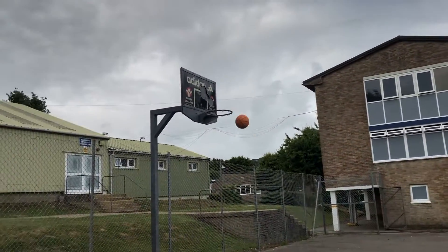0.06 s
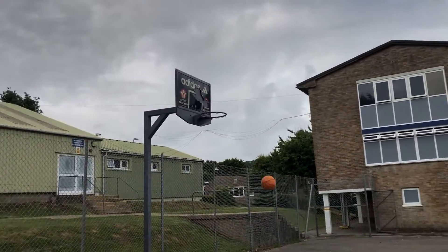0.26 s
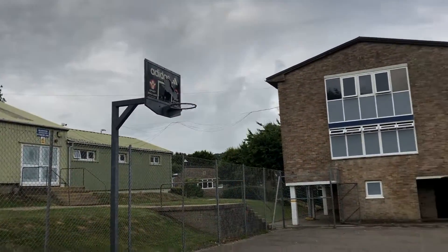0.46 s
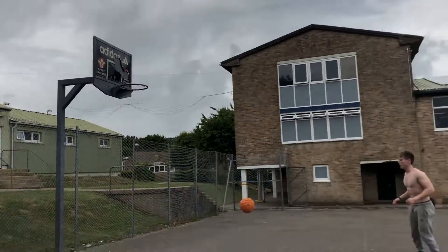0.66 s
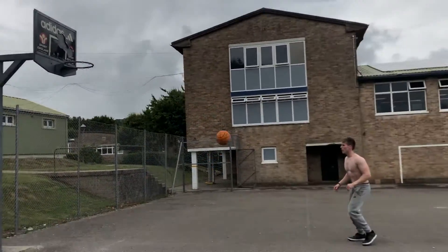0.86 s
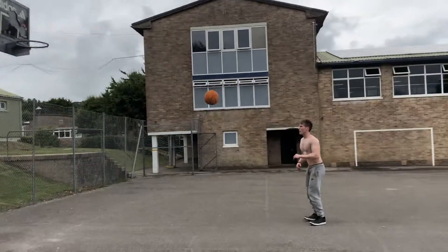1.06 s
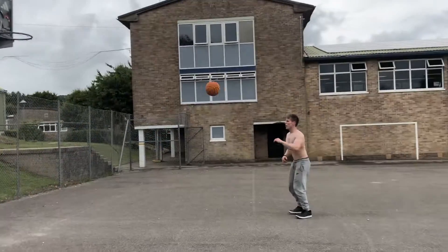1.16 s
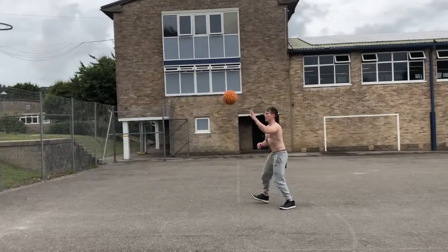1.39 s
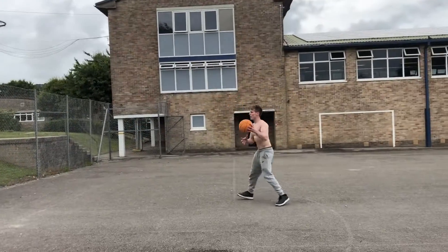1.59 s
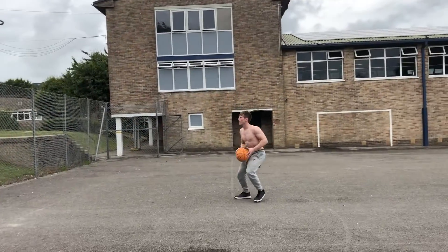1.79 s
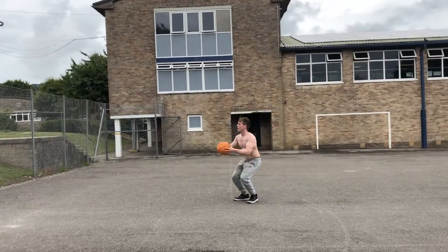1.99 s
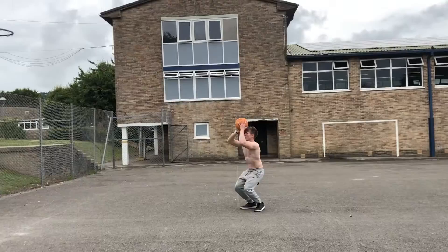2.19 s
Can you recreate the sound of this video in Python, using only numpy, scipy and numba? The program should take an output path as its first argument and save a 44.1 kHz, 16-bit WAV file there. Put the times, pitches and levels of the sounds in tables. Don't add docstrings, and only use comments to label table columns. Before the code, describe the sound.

A basketball bounces once on asphalt with a sharp, hollow bang and quick brick-wall echo. Before it a loose metal hoop rattles; afterwards wind buffets the phone microphone over faint shoe scuffs and hand taps outdoors.

```python
import sys
import numpy as np
from scipy import signal
from scipy.fft import rfft, irfft
from scipy.io import wavfile
from scipy.ndimage import uniform_filter1d
from numba import njit

SR = 44100
rng = np.random.default_rng(int(sys.argv[2]) if len(sys.argv) > 2 else 0)


def boost(x):
    u = np.asarray(x, float) / 20
    return 10 ** u


def digitize_waveform(pressure):
    field = np.atleast_2d(pressure).T
    bounded = np.clip(field, -1, 1)
    quanta = np.round(bounded * 32767).astype(np.int16)
    wavfile.write(sys.argv[1], SR, quanta)


N = 99048
T = np.arange(N) / SR
BOUNCE_S = 0.5012

# frequency in Hz, density in dB per Hz.
STREET_SPECTRUM = [(24, -33), (40, -18), (365, 2.5), (523, -18), (813, -15.5), (1330, -18.5), (2000, -28.5),
                   (2600, -64.5), (4400, -120)]
# frequency in Hz, density in dB per Hz.
AIR_SPECTRUM = [(300, -1), (600, -8.5), (1200, -15.5), (2300, -25), (4200, -28.5), (5800, -22),
                (7500, -33.5), (15500, -38)]
# time in seconds, level in dB.
GUST_LEVELS = [
    (0, -73),
    (.08, -58),
    (.8, -51),
    (.84, -52.5),
    (1.2, -43.5),
    (1.5, -44.5),
    (1.75, -47),
    (1.83, -46.5),
    (2.18, -48.5),
    (2.25, -51),
]
# peak in seconds, level in dB, corner in Hz, half length in seconds.
WIND_BUFFETS = [(.025, -48.5, 71, 0.032), (0.85, -36.5, 108.7, 0.014), (0.879, -36, 84, 0.0077),
                (0.919, -35.5, 168, 0.0082), (0.941, -30.5, 99.5, 0.016), (1.004, -40, 162, 0.03),
                (1.072, -35, 175, 0.016), (1.101, -36.5, 129, 0.0061), (1.131, -33.5, 246, 0.017),
                (1.176, -35, 173, .012), (1.258, -34.5, 113, 0.0075), (1.291, -40, 79.6, 0.034),
                (1.366, -33, 166, 0.016), (1.397, -28.5, 129, 0.0068), (1.426, -32.5, 110, 0.009),
                (1.482, -34, 163, 0.023), (1.548, -39.5, 129, 0.02), (1.62, -39, 120, 0.0071),
                (1.695, -41.5, 89, 0.019), (1.97, -50, 103, 0.021), (2.042, -44.5, 127, 0.0066),
                (2.118, -34.5, 103, 0.0053), (2.209, -38.5, 214, 0.011), (2.238, -36.5, 99, 0.034)]
SCUFF_STARTS = [1.7, 1.697, 1.7, 1.492, 2.093, 1.83, .484, 1.4, 1.835, 1.5, 1.705, 1.701, 1.701, 1.865,
                1.917, 1.585]
# length in seconds, level in dB, centre in Hz, width in Hz.
SCUFF_SOUNDS = [(0.061, -50, 1350, 640), (0.032, -64.5, 5200, 1550), (0.041, -60.5, 2200, 2900),
                (0.033, -66.5, 6100, 3000), (0.019, -65.5, 1500, 2100), (0.073, -61.5, 640, 700),
                (0.021, -52, 2000, 5800), (0.232, -63, 470, 680), (0.014, -64, 6300, 1400),
                (0.034, -71, 860, 2000), (0.024, -72, 13000, 8000), (0.051, -65, 2040, 420),
                (.008, -50.5, 1070, 680), (0.0055, -70.5, 2600, 2400), (0.011, -71, 5600, 2200),
                (.035, -72, 1360, 1700)]
TICK_STARTS = [.027, .03, .191, .232, .593, .597, .645, .646, .664, 1.057, 1.404, 1.428, 1.453, 1.545, 1.59,
               1.629, 1.663, 1.6735, 1.702, 1.7025, 2.115, 2.155, 2.243]
# peak in dB, pitch in Hz, t60 in seconds.
TICK_RINGS = [(-42, 1086, 0.024), (-43.5, 361, 0.068), (-38, 312, 0.029), (-39, 1050, .0072),
              (-40.5, 1660, 0.034), (-42.5, 563, .04), (-43.5, 362, 0.027), (-47, 1030, .03),
              (-54.5, 3600, 0.014), (-51, 6530, .006), (-50, 1900, 0.0043), (-49, 1800, 0.0056),
              (-39, 970, 0.0046), (-62.5, 5800, .006), (-38, 930, 0.0033), (-54, 5900, 0.0027),
              (-38.5, 1300, 0.0061), (-46, 1520, 0.0099), (-40, 494, 0.024), (-47, 1160, 0.0071),
              (-44.5, 500, 0.018), (-40.5, 425, 0.017), (-41.5, 1430, 0.0055)]
# start in seconds, peak in dB, low edge in Hz, high edge in Hz.
DRY_SNAPS = [(.0025, -37.5, 4500, 15500), (.0055, -56, 4500, 15500), (.0925, -60, 3500, 10900),
             (0.205, -46, 4000, 15000), (.2205, -52, 4000, 15500), (0.2326, -47, 3000, 14800),
             (0.255, -45, 3500, 8950), (.319, -54, 5000, 11000), (.437, -46, 8000, 15000),
             (0.5642, -41, 2500, 8000), (.582, -48, 5000, 15000), (.604, -48, 4000, 10000),
             (.615, -49, 4500, 15500), (.643, -59, 2500, 7000), (.6915, -54, 4000, 10000),
             (.7385, -49, 4000, 14100), (1.02, -51, 4500, 9000), (1.058, -47.5, 3000, 8600),
             (1.428, -47.5, 1500, 8800), (1.452, -48, 1200, 4000), (1.594, -50, 1200, 7000),
             (1.609, -50.5, 1500, 7000), (1.662, -49.5, 2000, 7900), (1.6732, -50, 2200, 7900),
             (1.6965, -50, 2800, 9100), (1.7, -56, 4000, 12000), (1.838, -50.5, 2200, 8000),
             (1.85, -55, 2500, 5970), (2.2435, -61, 1000, 6000)]
# start in seconds, peak in dB, decay in seconds.
RIM_SWINGS = [(0.0024, -36, 0.01), (0.0552, -45.5, 0.014), (0.1165, -35, 0.0069), (0.189, -33, 0.013),
              (0.271, -40, 0.015), (0.2864, -33, 0.0093), (0.348, -34, 0.0096), (0.4213, -34, 0.01),
              (0.559, -38, 0.023), (0.641, -46.5, 0.033), (0.715, -49.5, 0.03), (0.7762, -34.5, 0.0063),
              (0.836, -40, 0.011), (0.9125, -37, 0.0069), (0.9897, -42.5, 0.013), (1.1267, -38.5, 0.0085),
              (1.1833, -41, 0.008)]
# frequency in Hz, density in dB per Hz.
RATTLE_SPECTRUM = [(88, -9.5), (150, 7.5), (388, -3.5), (1130, -6), (1760, -12.5), (3400, -16.5),
                   (5900, -11.5), (8000, -22), (15500, -51.5)]
# frequency in Hz, level in dB, t60 in seconds.
HOOP_MODES = [(341, -6.5, 0.057), (669, -11.5, 0.15), (1103, -7.5, 0.077), (1764, -9, 0.046),
              (2688, -10, 0.027), (5810, -22, .04)]
# frequency in Hz, level in dB, delay after contact in seconds, rise in seconds.
BALL_MODES = [(63.7, -20, 0.014, 0.0035), (103, -14.5, 0.0081, 0.002), (263.4, -24.5, 0.00018, 0.0041),
              (437, -26, 0.0025, 0.0021), (622, -25, 0.0015, 0.0015), (988, -21.5, 0.00051, 0.0016),
              (1057, -29, 0.00721, 0.0033), (1336, -16.5, 0.00067, 0.00045),
              (1655, -24.5, 0.00092, 0.00087), (2444, -31, .0007, 0.00032), (4070, -27.5, .0004, 0.00025),
              (4780, -25, 0.0003, 0.00061), (5930, -16, 0.00032, 0.00022), (8280, -27, 0.000087, 0.0001)]
# delay in seconds, level in dB, top in Hz.
WALL_ECHOES = [
    (0.0904, -15, 3500),
    (.146, -23.5, 1190),
]
# frequency in Hz, density in dB per Hz.
TAIL_SPECTRUM = [(88, -8.5), (150, -1), (515, -19.5), (636, -8.5), (742, -16), (1090, -10.5), (2230, -27),
                 (6060, -27), (15000, -62)]


def unit(x):
    return x / np.sqrt(np.mean(x ** 2))


def noise():
    return rng.standard_normal(N)


def colour(x, shape):
    hz, db = np.array(shape).T
    f = np.maximum(np.arange(N // 2 + 1) * SR / N, 1)
    gain = boost(np.interp(np.log(f), np.log(hz), db, left=-90))
    return unit(irfft(rfft(x) * gain, N))


def ring(x, hz, t60):
    pole = np.exp(2j * np.pi * hz / SR - np.log(1000) / (t60 * SR))
    return signal.lfilter([1], [1, -pole], x.astype(complex)).imag


def band(x, lo_hz, hi_hz):
    edges = [max(lo_hz, 20), min(hi_hz, 0.45 * SR)]
    return signal.sosfilt(signal.butter(2, edges, "bandpass", fs=SR, output="sos"), x)


def swell(start, rise, fall):
    t = np.maximum(T - start, 0)
    return (1 - np.exp(-t / rise)) * np.exp(-t / fall)


def grains(per_s, spread_db):
    hit = rng.random(N) < per_s / SR
    sign = np.sign(noise())
    size = rng.exponential(size=N)
    return unit(hit * sign * boost(spread_db * size))


def walk(rate):
    k = int(SR / rate)
    steps = np.repeat(rng.standard_normal(N // k + 1), k)[:N]
    return unit(uniform_filter1d(uniform_filter1d(steps, k), k))


@njit
def sweep(x, hz, damp):
    y, b, l = np.empty(len(x)), 0., 0.
    for i in range(len(x)):
        g = np.tan(np.pi * hz[i] / SR)
        v = (b + g * (x[i] - l)) / (1 + g * (g + damp))
        y[i] = l + g * v
        b, l = 2 * v - b, 2 * y[i] - l
    return y


def later(x, s):
    return np.interp(T - s, T, x, left=0)


def street():
    turn_db = -6 * np.clip((T - 1.16) / 0.059, 0, 1)
    return boost(-58 + turn_db + 0.99 * walk(20)) * colour(noise(), STREET_SPECTRUM)


def air():
    return boost(-68 + 1.4 * walk(22.0)) * colour(noise(), AIR_SPECTRUM)


def wind():
    bed = boost(np.interp(T, *np.array(GUST_LEVELS).T) + 2.0 * walk(24.97))
    bumps = [boost(db) * np.exp(-((T - s) / half) ** 2) for s, db, _, half in WIND_BUFFETS]
    level = bed + sum(bumps)
    corner = bed * 120 + sum(bump * row[2] for bump, row in zip(bumps, WIND_BUFFETS))
    hz = corner / level * np.exp(0.19 * walk(30.055))
    eddies = sweep(sweep(noise(), hz, 1.0), 1.71 * hz, 1.57)
    eddies = signal.sosfilt(signal.butter(4, 47.4, "highpass", fs=SR, output="sos"), eddies)
    power = uniform_filter1d(uniform_filter1d(eddies ** 2, size=600), size=600)
    return unit(eddies / np.sqrt(power + 1e-12)) * level


def scuffs():
    grit = grains(1600, 4.3) + 0.5 * noise()
    out = 0
    for s, (length, db, hz, width) in zip(SCUFF_STARTS, SCUFF_SOUNDS):
        press = np.clip((T - s) / 0.0026, 0, 1)
        lift = np.clip((s + length - T) / 0.021 + 0.5, 0, 1)
        out = out + boost(db) * press * lift * unit(band(grit, hz - width / 2, hz + width / 2))
    return out * boost(2 * walk(120))


def ticks():
    sag_cycles, sag_s, rise_cycles = 0.71, 0.00077, 0.92
    out = 0
    for s, (db, hz, t60) in zip(TICK_STARTS, TICK_RINGS):
        t = np.maximum(T - s, 0)
        sag = sag_cycles * (hz < 800) * (1 - np.exp(-t / sag_s))
        ringing = np.sin(2 * np.pi * (hz * t + sag))
        out = out + 2 * boost(db) * swell(s, rise_cycles / max(hz, 1000), t60 / np.log(1000)) * ringing
    return out


def snaps():
    snap_s = 0.00052
    hiss = np.sign(noise())
    out = 0
    for s, db, lo_hz, hi_hz in DRY_SNAPS:
        impulse = 1.02 * (np.abs(T - s) < 0.5 / SR)
        burst = 0.4 * swell(s, snap_s / 2, snap_s) * hiss
        out = out + 3 * boost(db) * band(impulse + burst, lo_hz, hi_hz)
    return band(out, 1500, 8300) + boost(-11) * out


def hoop():
    rise_s, dulls_db_per_s = 0.0051, -4
    shake = 0
    for s, db, decay in RIM_SWINGS:
        onset = np.clip((T - s + 0.0035) / rise_s, 0, 1)
        blow = swell(s - 0.003, rise_s, decay) * onset
        shake = shake + boost(db) * (blow + 0.046 * swell(s, 0.031, 0.084))
    knocks = grains(4000, 2.4) + 0.6 * noise()
    spray = colour(knocks, RATTLE_SPECTRUM)
    spray = spray - (1 - boost(dulls_db_per_s * T)) * band(spray, 6500, 13200)
    modes = sum(boost(db) * ring(shake * knocks, hz, t60) for hz, db, t60 in HOOP_MODES)
    return boost(-4) * (shake * spray + 0.026 * boost(8.9 * T) * modes)


def court_tail():
    level = swell(BOUNCE_S + 0.021, 0.043, 0.94 / np.log(1000)) * boost(2.5 * walk(70.3))
    hum_level = boost(-45) * swell(BOUNCE_S + 0.078, 0.039, 0.51 / np.log(1000))
    hum = hum_level * unit(ring(noise(), 1082, 0.028))
    return hum + boost(-44.5) * level * colour(noise(), TAIL_SPECTRUM)


def wall_echoes(bang, soft):
    ledges = (grains(640, 3.1) * swell(0, 0.00042, 0.031))[:N // 20] / 10
    rough = bang + 0.054 * signal.fftconvolve(soft, ledges)[:N]
    return sum(boost(db) * band(later(rough, s), 68, top_hz) for s, db, top_hz in WALL_ECHOES)


def ground_scatter():
    wash = band(band(noise(), 3600, 7300), 3600, 7300)
    return boost(-23) * swell(BOUNCE_S + 0.0064, 0.0097, 0.0071) * wash


def thud():
    rumble = unit(band(band(noise(), 400, 1700), 400, 1700))
    return boost(-30) * swell(BOUNCE_S + 0.0022, 0.00045, 0.014) * rumble


def slap():
    slap_db = -24.5
    main = boost(slap_db) * swell(BOUNCE_S, 0.0004, 0.0023) * band(noise(), 2500, 8200)
    edge = swell(BOUNCE_S - 0.0002, 0.00027, 0.0004) * band(noise(), 9000, 15500)
    return main + boost(slap_db - 7) * edge


def ball_body():
    body = 0
    for hz, db, delay, rise in BALL_MODES:
        t = np.maximum(T - BOUNCE_S - delay, 0)
        pulse = (t / rise * np.exp(1 - t / rise / 2) / 2) ** 2
        body = body + boost(db) * pulse * np.sin(2 * np.pi * hz * t)
    return body


def bounce():
    sharp = slap()
    soft = ball_body() + thud()
    bang = soft + sharp
    return bang + ground_scatter() + wall_echoes(bang, soft) + court_tail()


def scene():
    near = bounce() + hoop()
    handling = ticks() + snaps() + scuffs()
    background = wind() + street() + air()
    return (near + handling + background)[None]


def low_pass(x):
    return signal.sosfilt(signal.butter(12, 16410, fs=SR, output="sos"), x)


def record(dry):
    mix = signal.sosfilt(signal.butter(2, 32, "highpass", fs=SR, output="sos"), dry)
    mix = signal.sosfilt(signal.ellip(10, 0.3, 70, 15800, fs=SR, output="sos"), mix)
    return low_pass(mix)


dry = scene()
out = record(dry)
digitize_waveform(out)
```